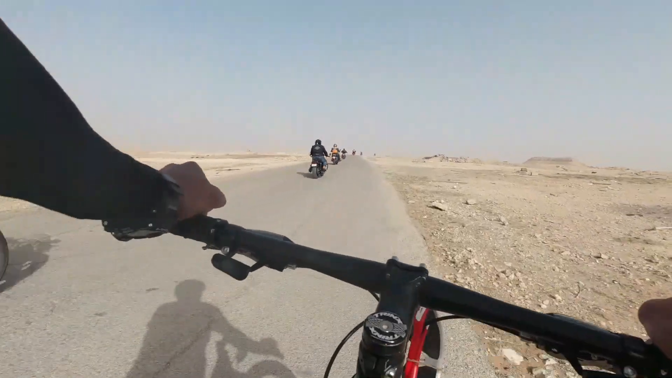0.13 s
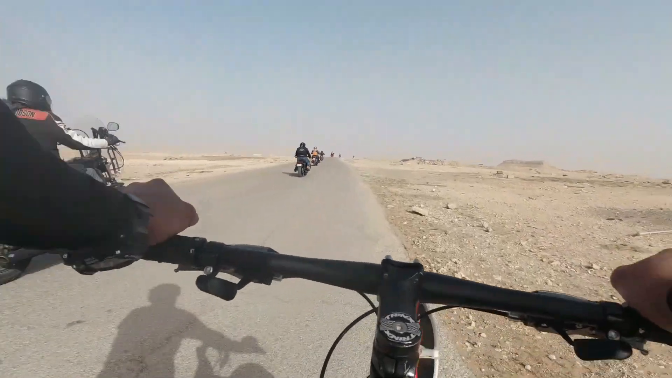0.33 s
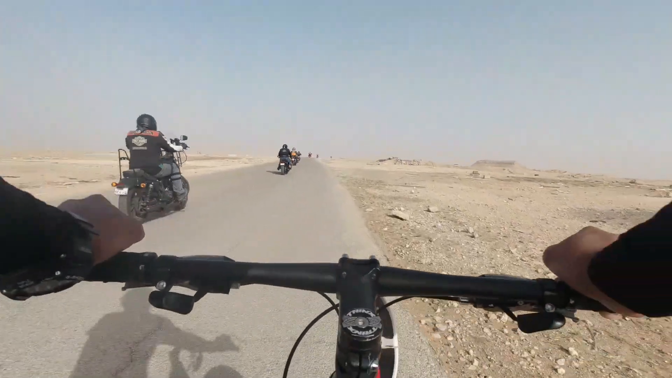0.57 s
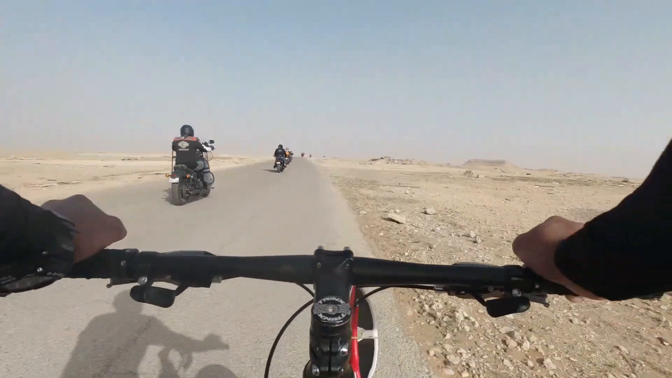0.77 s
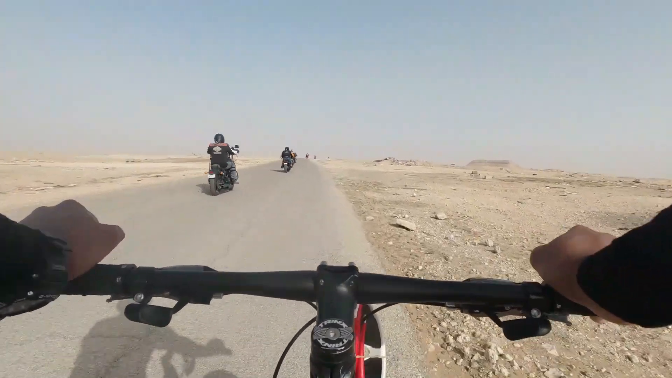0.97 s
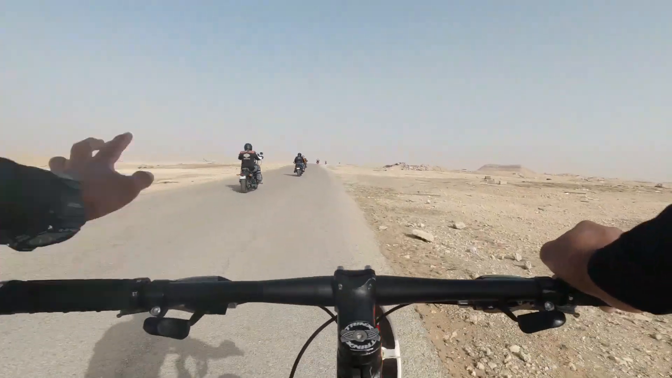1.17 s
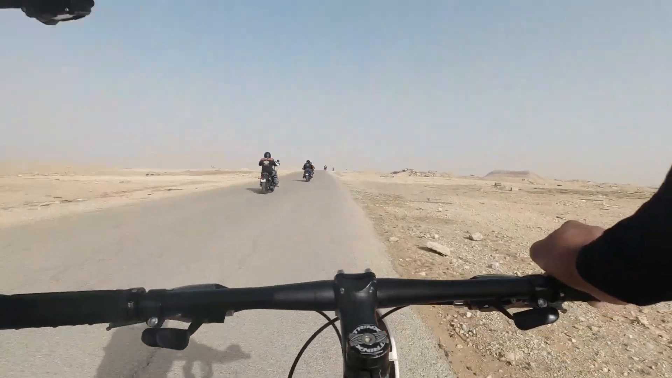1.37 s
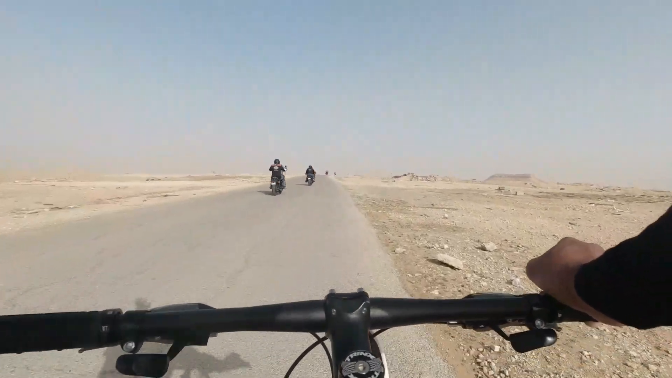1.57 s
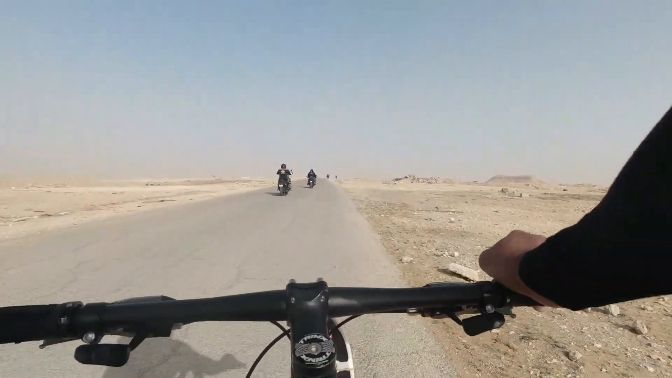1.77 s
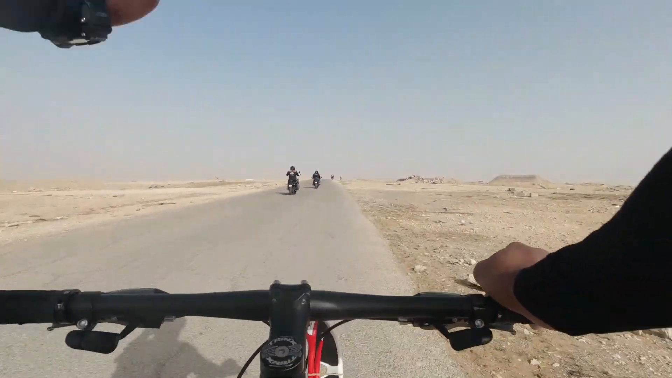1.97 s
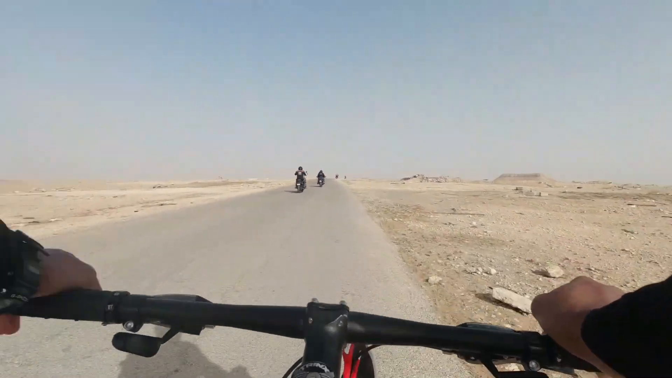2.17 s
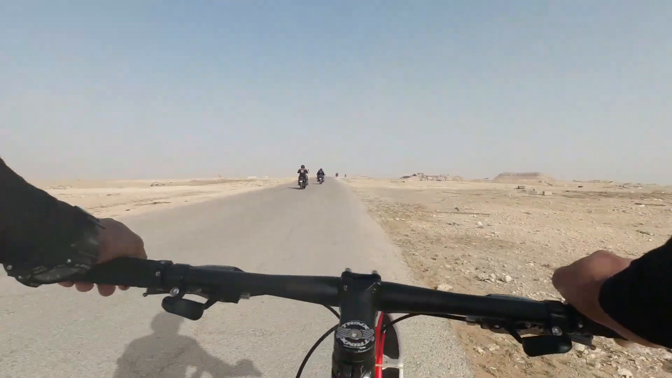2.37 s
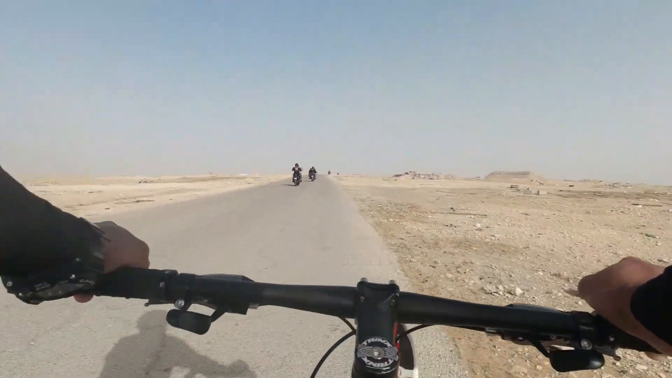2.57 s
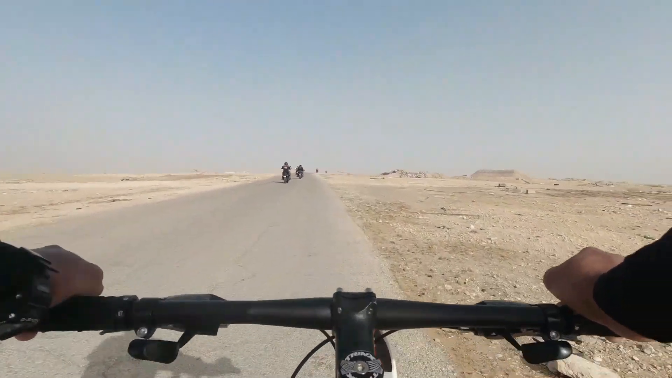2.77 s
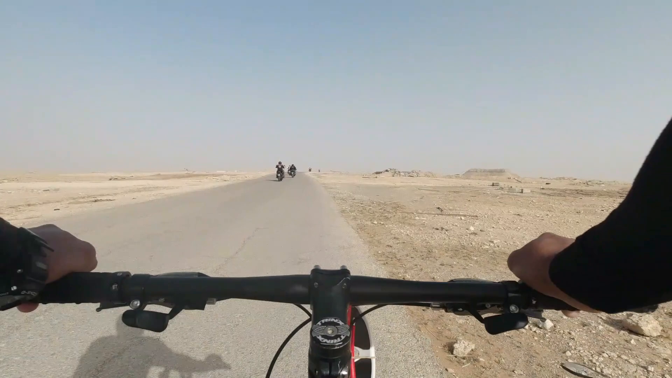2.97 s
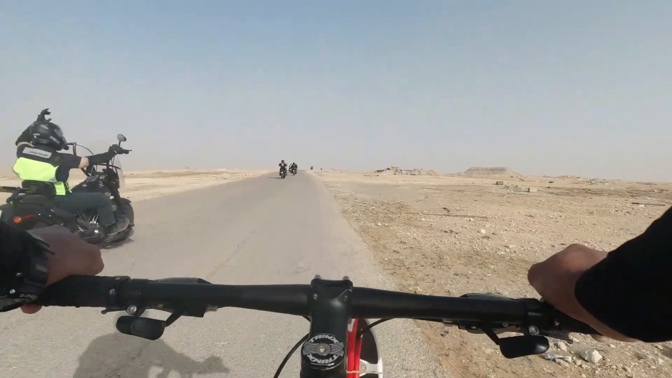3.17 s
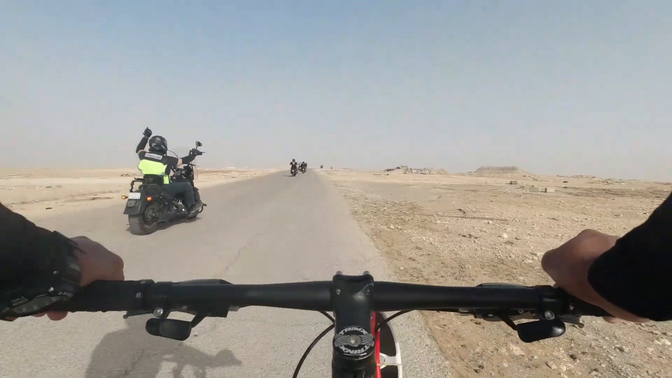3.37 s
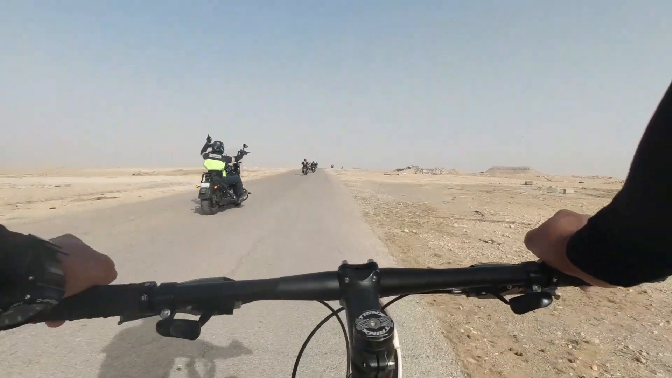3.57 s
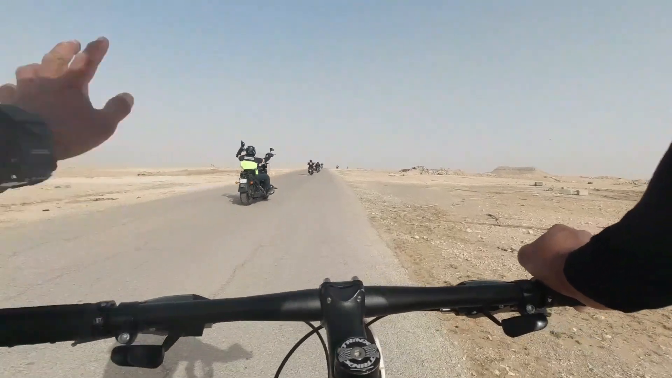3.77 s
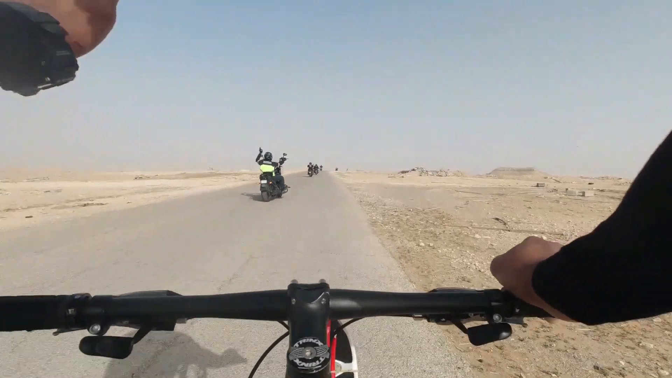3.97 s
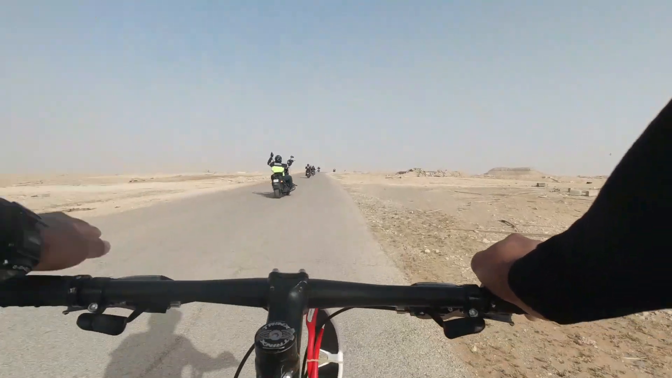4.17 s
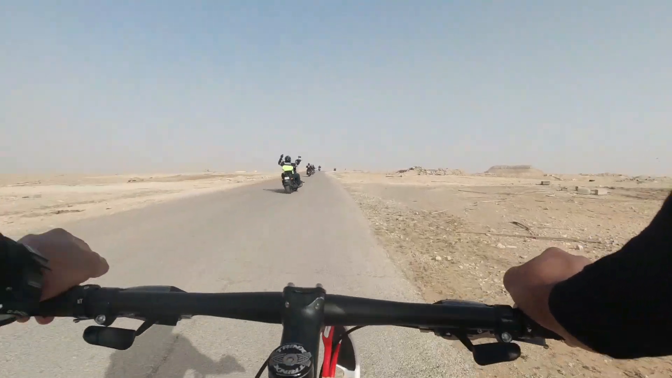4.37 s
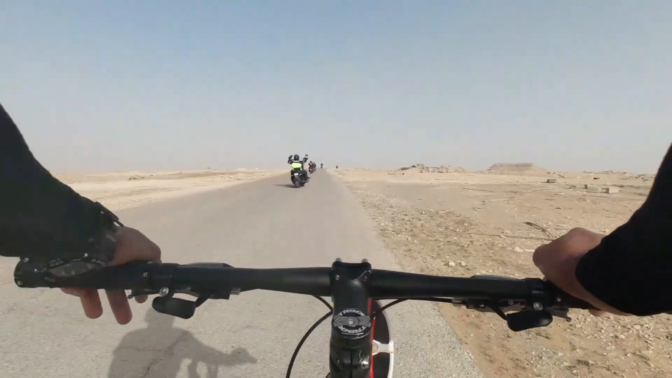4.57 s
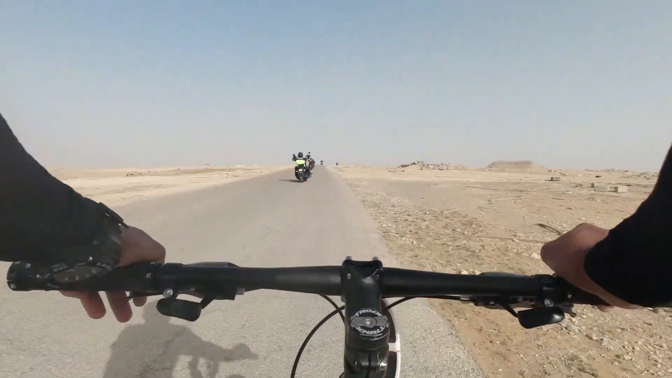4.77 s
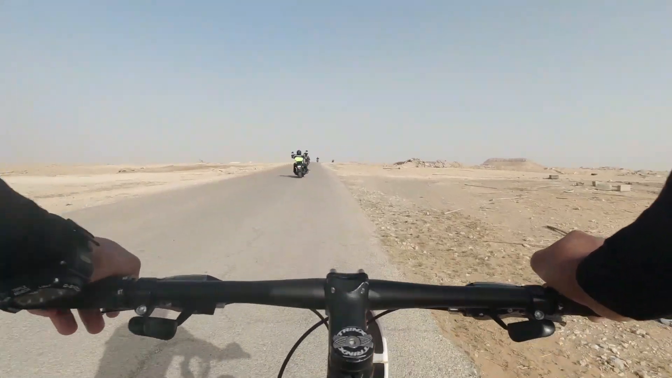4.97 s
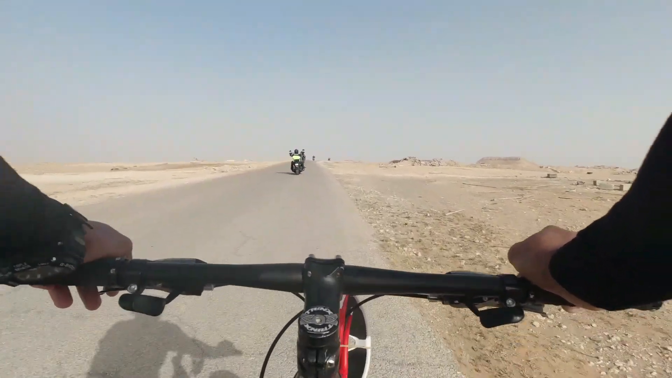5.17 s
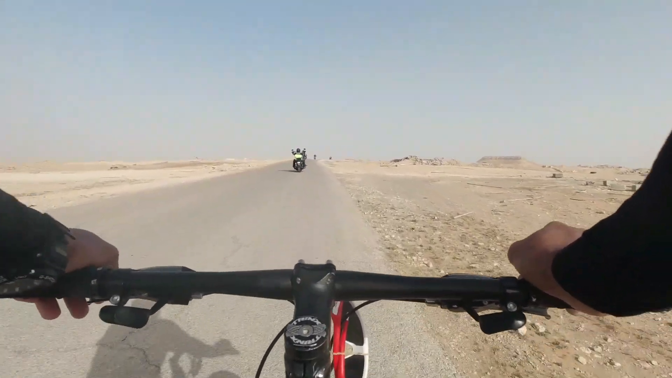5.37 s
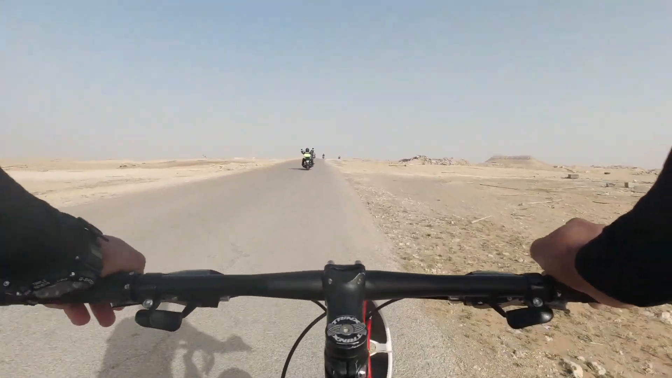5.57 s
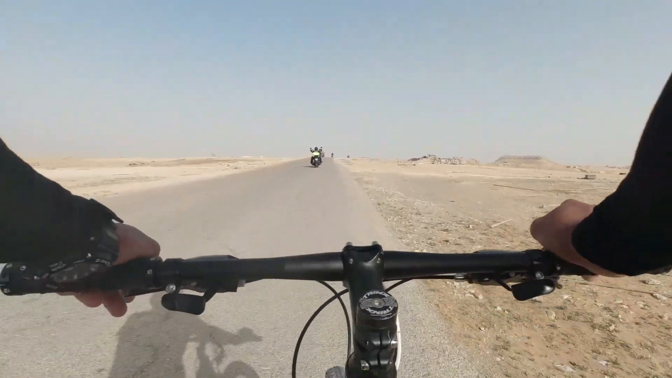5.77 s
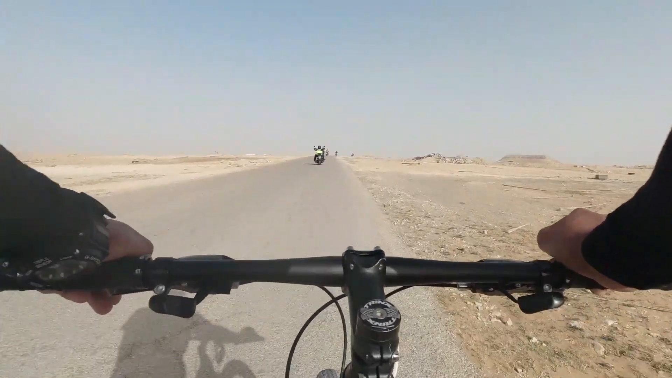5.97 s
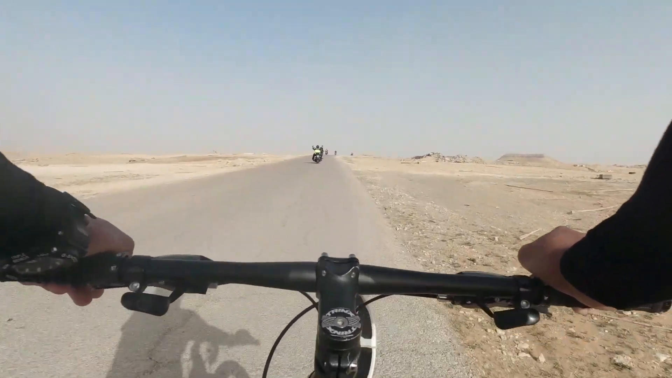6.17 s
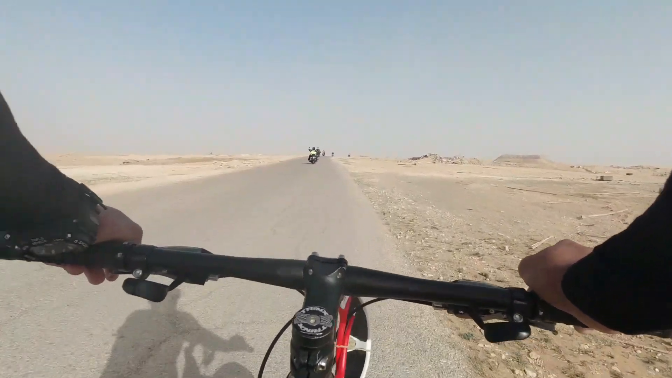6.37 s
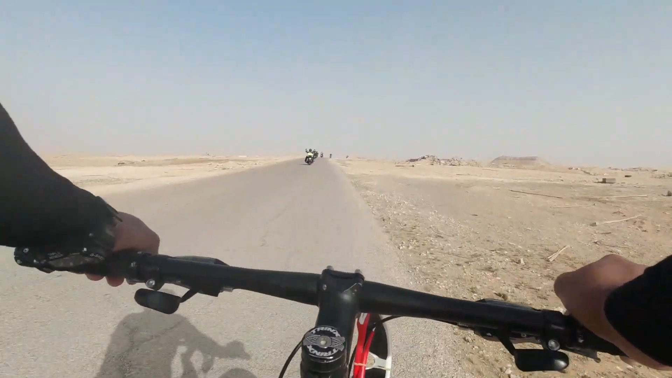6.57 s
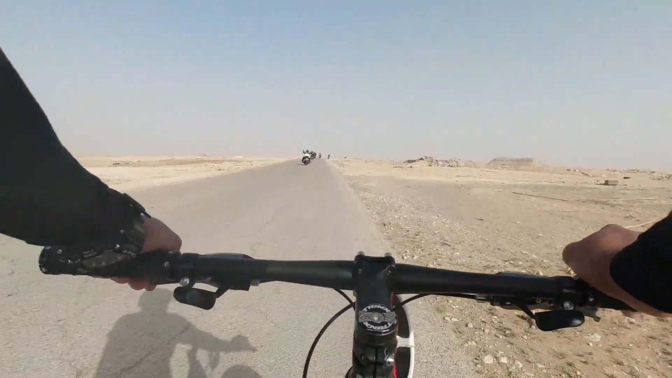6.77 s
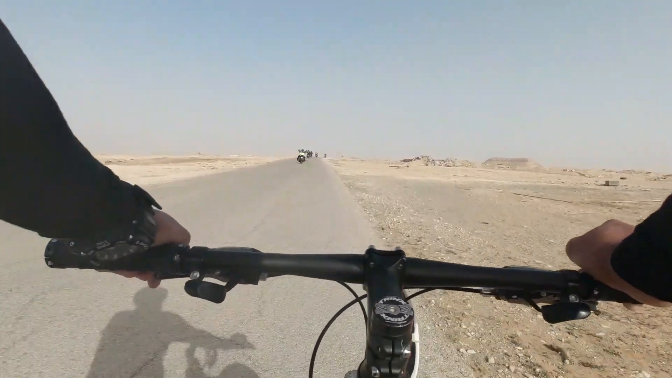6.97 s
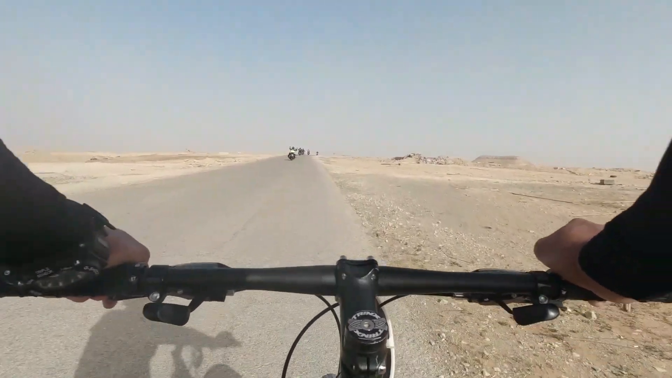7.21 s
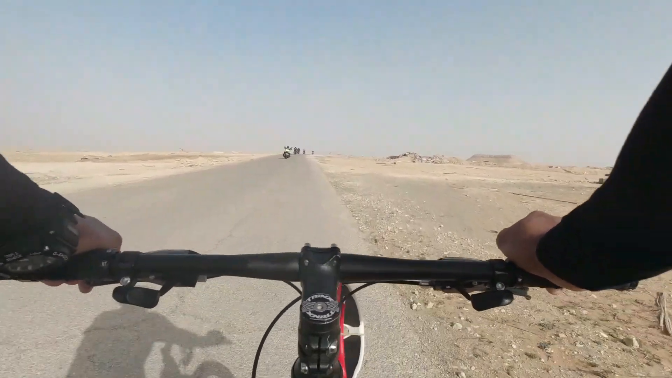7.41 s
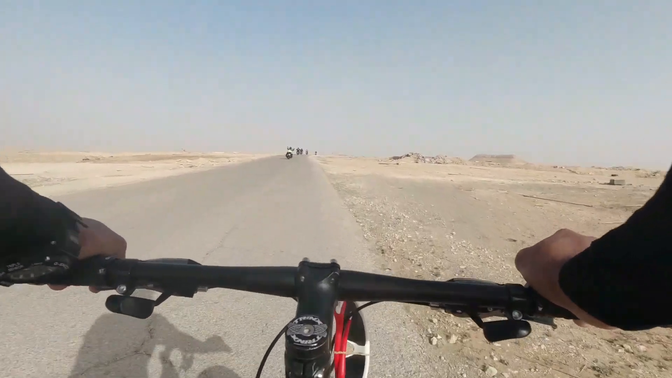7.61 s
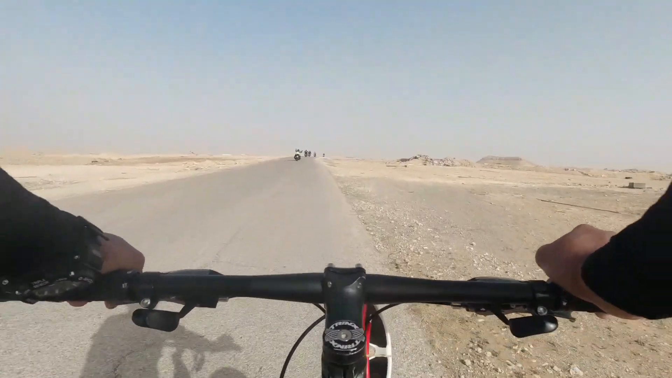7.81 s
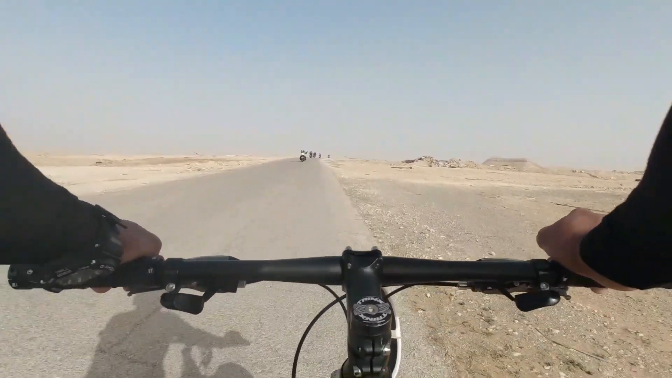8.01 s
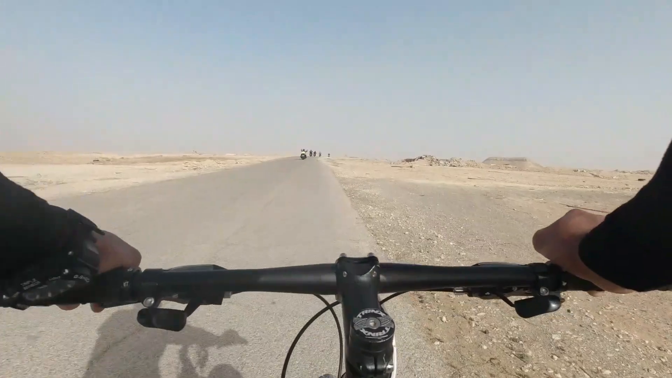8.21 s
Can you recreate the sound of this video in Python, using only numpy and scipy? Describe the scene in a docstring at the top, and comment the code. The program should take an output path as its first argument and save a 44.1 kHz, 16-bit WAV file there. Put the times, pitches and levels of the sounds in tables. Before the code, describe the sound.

Two motorcycles overtake a bicycle on an open road: first a raw, rasping blast, then a softer deep throb, both fading into low wind.

```python
"""Two motorcycles overtake a bicycle

On an open road one V-twin passes close by, shifts up and crackles away; a muffled twin follows it past.
Far up the road a twin opens its throttle. Firings ring each exhaust pipe and spit bursts of gas;
tyres roar alongside. The microphone has two ports and rides on the cyclist's chest, which reflects the
sound; wind buffets the ports, an arm swishes and clothing brushes."""
import sys
import numpy as np
from scipy import signal
from scipy.fft import rfft, irfft
from scipy.io import wavfile
from scipy.ndimage import uniform_filter1d, minimum_filter1d, map_coordinates

SR = 44100
rng = np.random.default_rng(int(sys.argv[2]) if len(sys.argv) > 2 else 0)


def wrap_up_sound(samples):
    """Save the sound to the file named by the first command line argument, as 16-bit audio."""
    columns = np.atleast_2d(samples).T
    # keep every value between -1 and 1, then stretch to whole-number steps
    tamed = np.clip(columns, -1, 1)
    steps = np.round(tamed * 32767).astype(np.int16)
    wavfile.write(sys.argv[1], SR, steps)


N = 363825
T = np.arange(N) / SR  # time in seconds
F = np.arange(N // 2 + 1) * SR / N + 1e-6  # frequency in Hz, kept off zero

# Colour of the tyre noise of both passing bikes. Each row: frequency in Hz, density in dB per Hz.
TYRE_SPECTRUM = [(40, 4), (200, 11.5), (500, -3), (850, -4), (1300, -5.5), (1800, -0.5), (2400, -15),
                 (3200, -9), (4200, -16.5), (6000, -22.5), (8400, -28.5), (14000, -28.5), (16000, -39)]


def undb(db):
    """Turn dB into an amplitude factor."""
    return 10 ** (np.asarray(db) / 20)


def unit(x):
    """Scale a sound to rms 1."""
    return x / np.sqrt(np.mean(x ** 2))


def curves(table):
    """The columns of a table, joined by straight lines in time."""
    s, *columns = np.transpose(table)
    return [np.interp(T, s, column) for column in columns]


def colour(x, spectrum):
    """Give white sound a spectrum, drawn straight over log frequency."""
    hz, db = np.transpose(spectrum)
    return irfft(rfft(x) * undb(np.interp(np.log(F), np.log(hz), db)), N)


def noise(spectrum, channels=3):
    """Unrelated noises of one colour, rms 1."""
    return unit(colour(rng.standard_normal((channels, N)), spectrum))


def treble_unit(x):
    """Scale a sound so that its part above 2 kHz has rms 1."""
    high_pass = signal.butter(4, 2000, "high", fs=SR, output="sos")
    return x / np.std(signal.sosfilt(high_pass, x))


def walk(rate):
    """Random levels held 1 / rate s and slewed twice; spread near 1."""
    hold = int(SR / rate)
    steps = np.repeat(rng.standard_normal(N // hold + 1), hold)
    return 1.3 * uniform_filter1d(uniform_filter1d(steps, hold), hold)[:N]


def swell(at_s, length_s):
    """A smooth rise and fall, 1 at its top."""
    return np.exp(-((T - at_s) / length_s) ** 2)


def delayed(x, seconds):
    """Read a sound through a moving delay."""
    return map_coordinates(x, [(T - seconds) * SR], order=3)


def wander_phase(hz, stray, rate):
    """Phase in radians of a tone whose pitch strays by a share of itself."""
    return 2 * np.pi * np.cumsum(hz * (1 + stray * walk(rate))) / SR


def overtake(abreast_s, speed, gap, shadow_edge, softness=0.053):
    """Cosine of the bearing, nearness (1 alongside) and body shadow (0-1) of a bike passing at a side gap.

    Speed is in m/s and gap in metres; the cyclist's body shades a bike that is still behind.
    """
    along = speed * (T - abreast_s)
    distance = np.hypot(along, gap)
    ahead = along / distance
    shadow = (1 - np.tanh((ahead + shadow_edge) / softness / 2)) / 2
    return ahead, gap / distance, shadow


def firings(speed, crank, scatter_db):
    """One pulse train for each cylinder; no two firings are equally strong."""
    start, rear_lag = crank  # in four-stroke cycles
    cycles = start + np.cumsum(curves(speed)[0]) / SR
    pulses = np.zeros((2, N))
    for train, lag in zip(pulses, (0, rear_lag)):
        at = np.flatnonzero(np.diff(np.floor(cycles - lag)))
        train[at] = undb(scatter_db * rng.standard_normal(len(at)))
    return pulses


def ring_pipe(pulses, pipe, soft_hz, low_hz=60):
    """The firings of both cylinders ring each mode of the pipe; one row per mode."""
    s, push = 1j * F, rfft(pulses)
    # the valve opens gradually, and a small outlet radiates no deep bass
    push = push * soft_hz ** 2 / (s * s + np.sqrt(2) * soft_hz * s + soft_hz ** 2)
    push = push * s * s / (s * s + np.sqrt(2) * low_hz * s + low_hz ** 2)
    modes = []
    for k, (hz, width, front_db, rear_db, *_) in enumerate(pipe):
        resonance = -(-1) ** k * s * width / (s * s + s * width + hz ** 2)
        drive = undb(front_db) * push[0] + undb(rear_db) * push[1]
        modes.append(irfft(resonance * drive, N))
    return np.array(modes)


def exhaust(pulses, pipe, ahead, shadow, shade_db, soft_hz):
    """A passing pipe: dulled by the body's shadow, each mode changing as the outlet turns to the listener."""
    facing = np.maximum(ahead, 0) ** 2
    sound = 0
    for row, mode in zip(pipe, ring_pipe(pulses, pipe, soft_hz)):
        octaves = np.log2(row[0] / 50)  # shade_db is per octave above 50 Hz
        sound = sound + mode * undb(row[4] * facing + shade_db * shadow * octaves)
    return unit(sound)


def gas(pulses, spectrum, rear_db, decay_s, tail_db, shock_db=1, tail_s=0.033, wait_s=0.00081,
        rise_s=0.0024, channels=3):
    """A crack of gas leaves the pipe just after each firing and trails off."""
    age = np.maximum(T[:SR // 10] - wait_s, 0)
    fall = np.exp(-age / decay_s) + undb(tail_db) * np.exp(-age / tail_s)
    burst = (1 - np.exp(-age / rise_s)) * fall
    # jet noise grows with the square of the firing strength
    strength = pulses[0] ** 2 + undb(rear_db) * pulses[1] ** 2
    turbulence = signal.oaconvolve(strength, burst)[:N] * rng.standard_normal((channels, N))
    # the shock front rattles down the pipe the same way every time
    rattle = burst * rng.standard_normal((channels, len(burst)))
    shock = signal.oaconvolve(strength[None], rattle)[:, :N]
    return treble_unit(colour(turbulence + undb(shock_db) * shock, spectrum))


def ragged(x, share=1.0, echo_s=0.000774, sway_s=0.0002276, rate=18):
    """A short echo of wandering length gives every burst its own colour."""
    at = (T - echo_s - sway_s * walk(rate)) * SR
    echo = np.array([np.interp(at, np.arange(N), channel) for channel in x])
    return (x + share * echo) / np.hypot(1, share)


def at_camera(pipes, hiss, ahead, scatter_hz):
    """Chest echo comes later as a source moves ahead; the lag between the ports is greatest abreast."""
    # arms and handlebar scatter short waves, so that each port gets its own treble
    scattered = 1 / (1 + (scatter_hz / F) ** 4)
    hiss = rfft(hiss)
    direct = pipes + irfft(hiss[0] * np.sqrt(1 - scattered), N)
    chest_share = 0.53  # echo amplitude relative to the direct sound
    chest_echo = delayed(direct, 0.00033 * (0.68 + 0.27 * ahead))
    sound = (direct + chest_share * chest_echo) / (1 + chest_share)
    port_lag_s = 0.00016 * np.sqrt(1 - ahead ** 2)
    treble = irfft(hiss[1:] * np.sqrt(scattered), N)
    return np.array([delayed(sound, port_lag_s), sound]) + treble


def wind(steady_db=-36.5, shared=.6, gust_db=1.0, buffet_db=1.8):
    """Air buffets each port on its own, part of its rush is common, and it swells in each bike's wake."""
    # Rush of air over the ports. Each row: frequency in Hz, density in dB per Hz.
    wind_spectrum = [(20, -3), (45, -4), (90, 5.5), (200, 3.5), (350, -7), (600, -17.5), (1000, -30.5),
                     (1500, -40.5), (2200, -32.5), (3100, -46), (4500, -62), (7000, -56.5), (11000, -64),
                     (16000, -69)]
    # Air pushed aside by each passing bike. Each row: time in seconds, half length in seconds, rise in dB.
    wakes = [(0.594, 1, 9.5), (3.83, 0.89, 4.5)]
    first, second, both = noise(wind_spectrum)
    ports = np.array([port * undb(buffet_db * walk(22)) for port in (first, second)])
    rush = np.sqrt(1 - shared) * ports + np.sqrt(shared) * both  # shared is a share of the power
    wake_db = sum(db * swell(s, length) for s, length, db in wakes)
    return undb(steady_db + wake_db + gust_db * walk(4.15)) * rush


def swish(at_s=2.05, length_s=0.19, level_db=-52):
    """A soft swell of coloured noise, the air moved while the cyclist waves an arm."""
    air = noise([(200, -21), (700, 1), (1200, 6), (1700, -3.5), (3000, -11), (6000, -40), (16000, -45)],
                channels=1)
    return undb(level_db) * swell(at_s, length_s) * air


def pedalling(length_s=0.14):
    """Clothing brushes faintly with the turn of the pedals: swells of airy noise."""
    # Faint brushes, one per turn. Each row: time in seconds, level in dB.
    brushes = [(5.82, -79), (6.9, -74), (7.98, -73.5)]
    cloth = noise([(2000, -20), (5300, 6), (7000, -3), (9500, 10), (16000, -11)], channels=2)
    return sum(undb(db) * swell(s, length_s) for s, db in brushes) * cloth


def far_twin(exhaust_db=-33.5, gas_db=-58.0, gas_load=0.3):
    """A twin far up the road opens its throttle; moving air makes its level waver."""
    # Engine speed. Each row: time in seconds, four-stroke cycles per second.
    engine_speed = [(0, 13.2), (2.5, 13.2), (5, 12.5), (5.7, 12.82), (6.2, 13.46), (6.8, 14.03),
                    (7.4, 15.06), (8.25, 16.2)]
    # Throttle. Each row: time in seconds, level in dB relative to pulling.
    throttle = [(0, 1), (2, -6), (4.3, -10.5), (5.6, -15), (5.85, -7.5), (6.1, 0), (6.45, -2.5),
                (6.75, -1.5), (7, -5), (7.25, -3), (7.6, -9.5), (8.25, -4)]
    # Pipe modes. Each row: frequency in Hz, width in Hz, front cylinder in dB, rear cylinder in dB.
    pipe_modes = [(101.6, 81.5, -3.5, -6.5), (115, 60.5, 0.0, -7.5), (125, 40, -11, -27),
                  (233.9, 124, -8.5, -19.5), (234.6, 67, -7.5, -17.5), (370, 67, -28.0, -15.0),
                  (365.4, 82, -15.5, -25.5), (605, 26.6, -23.5, -35), (913, 80.9, -32, -30)]
    # Colour of the gas bursts. Each row: frequency in Hz, density in dB per Hz.
    gas_spectrum = [(200, -7), (600, 17.5), (1000, 10.5), (1600, 3), (2300, -2.5), (3200, -2),
                    (4000, -17.5), (4700, -22), (5500, -30.5), (7000, -46), (11000, -42), (16000, -70)]
    throttle_db, = curves(throttle)
    pulses = firings(engine_speed, crank=(.946, .442), scatter_db=1.2)
    uneven = pulses * undb(.8 * walk(30))
    cracks = gas(uneven, gas_spectrum, rear_db=0, decay_s=0.0021, tail_db=-16, wait_s=0.00508)
    pipes = unit(ring_pipe(pulses, pipe_modes, soft_hz=654).sum(axis=0))
    pipes = undb(exhaust_db + throttle_db) * pipes
    # gas_load: dB of gas per dB of throttle
    hiss = undb(gas_db + gas_load * throttle_db) * ragged(cracks, share=0.6)
    waver = undb(.7 * walk(5))
    return waver * at_camera(pipes, hiss, ahead=1.0, scatter_hz=4460)


def roar(start_s=2.77, rise_s=0.023, fade_s=0.54, level_db=-37, flutter_db=2.5):
    """The second bike's belt and tyres break into a rough roar as it leaves the body's shadow."""
    age = np.maximum(T - start_s, 0)
    grain = noise([(400, -21), (800, 1.5), (1300, -3), (1800, -1), (2300, -29), (3200, -24),
                   (6000, -21), (16000, -40)])
    envelope = (1 - np.exp(-age / rise_s)) * np.exp(-(age / fade_s) ** 2)
    return undb(level_db + flutter_db * walk(120)) * envelope * grain


def second_bike(exhaust_db=-11.0, puff_db=-50, rush_db=-19, outlet_angle=0.61, beam_width=0.77):
    """A muffled twin eases off as it passes: deep throb, soft puffs of gas and tyre roar."""
    # Engine speed. Each row: time in seconds, four-stroke cycles per second.
    engine_speed = [(0, 16.6), (1.5, 16.5), (2.1, 16.0), (2.6, 15.57), (3, 14.84), (3.3, 14.2), (3.7, 13.6),
                    (4.5, 13.3), (8.25, 13.0)]
    # Throttle. Each row: time in seconds, level in dB relative to pulling.
    throttle = [(0.0, 2), (1.9, -20), (2.2, -5.5), (2.7, -6.5), (2.9, -2.5), (3.15, 1.28), (3.45, -0.33),
                (3.65, -12), (3.9, -9), (4.15, -27), (8.25, -26)]
    # Pipe modes. Each row: frequency in Hz, width in Hz, front cylinder in dB, rear cylinder in dB,
    # gain in dB when the outlet faces the listener.
    pipe_modes = [(70, 25.7, -13, -19.5, 3), (112.4, 49.7, -14.5, -16.5, -1.5),
                  (166.4, 58.8, -31.5, -11.5, 1), (168.7, 27.5, -18, -22.5, 12.5),
                  (190, 19.4, -7.5, 0.0, 2.5), (189.5, 42, -14, -1.63, 2.4), (300.4, 19.7, -20, -18.5, 2.8),
                  (324.6, 23.1, -20.5, -29.5, 8), (356, 74, -28.5, -33, 5), (441.3, 8.3, -38.5, -35.5, 18),
                  (594.7, 7.7, -41.0, -42, 21.5)]
    # Colour of the gas puffs. Each row: frequency in Hz, density in dB per Hz.
    puff_spectrum = [(200, -44), (900, 17), (1200, 16), (1600, -10), (2300, 6), (3200, 2.5), (4000, -1),
                     (4700, -7.5), (5500, -15.5), (7000, -24), (11000, -14.5), (16000, -46)]
    # Colour of the muffled gas flow. Each row: frequency in Hz, density in dB per Hz.
    flow_spectrum = [(150, -7), (350, 6), (580, 9), (850, -14), (1170, -9), (1500, -42), (3200, -25),
                     (6000, -31), (16000, -37)]
    ahead, near, shadow = overtake(abreast_s=3.05, speed=8.0, gap=2.3, shadow_edge=0.77)
    throttle_db, = curves(throttle)
    loudness = near * undb(exhaust_db + throttle_db)
    pulses = firings(engine_speed, crank=(-.01, .425), scatter_db=.5)
    puffs = undb(puff_db) * gas(pulses, puff_spectrum, rear_db=1, decay_s=0.0012, tail_db=-15)
    puffs = puffs * near * undb(-2 * shadow + 3.5 * ahead)
    tyres = undb(-29.5 - 4.3 * shadow) * near ** 2.84 * noise(TYRE_SPECTRUM)
    # the muffler evens the gas into a steady rush, heard while its outlet faces the listener (radians)
    beam = np.exp(-((np.arccos(ahead) - outlet_angle) / beam_width) ** 2)
    rush = loudness * undb(rush_db) * beam * noise(flow_spectrum)
    pipes = loudness * exhaust(pulses, pipe_modes, ahead, shadow, shade_db=-1.6, soft_hz=664)
    # a throaty rasp as the outlet swings past
    throat = noise([(700, -17), (1000, -9), (1200, 6), (1500, -31), (3000, -60)])
    throat = undb(-35) * swell(3.35, 0.073) * throat
    return at_camera(pipes, puffs + tyres + roar() + rush + throat, ahead, scatter_hz=4000)


def rasp(pulses, width_hz, decay_s=0.008, rough=.12, wait_s=.001, stray=.06, spread=.06):
    """Firings and the gas behind them ring bands of straying pitch; each swells and fades at its own time."""
    # Swells of ringing rasp. Each row: time in seconds, half length in seconds, centre in Hz, level in dB.
    rasp_bands = [(0.125, 0.14, 683, -29.5), (0.44, 0.091, 1560, -22.5), (0.456, 0.13, 1003, -27),
                  (.74, 0.17, 2900, -38), (1.057, 0.23, 5180, -42.5), (0.94, 0.24, 614.6, -28.5),
                  (1.11, 0.23, 1061, -36.5), (1.317, 0.22, 822, -35.5), (1.39, 0.11, 2620, -46.5),
                  (2.96, 0.22, 3300, -52), (3.74, 0.11, 3750, -54), (.5, 0.36, 409.3, -26),
                  (1.0, 0.38, 9760, -54)]
    age, blows = T[:SR // 30], pulses.sum(axis=0)
    gas_behind = signal.oaconvolve(blows, np.exp(-age / decay_s))[:N] * rng.standard_normal(N)
    push = blows + rough * gas_behind
    age = np.maximum(age - wait_s, 0)
    out = 0
    for s, length, hz, db in rasp_bands:
        ring = age * np.exp(-np.pi * (width_hz + spread * hz) * age)  # higher bands ring shorter
        rings = signal.oaconvolve(push, ring)[:N]
        tone = np.sin(wander_phase(hz, stray, rate=36))
        out = out + undb(db) * swell(s, length) * unit(rings * tone)
    return out


def ticks(pulses, pitch_hz=3120, stray=0.08, ring_s=0.0006, wait_s=.0027):
    """A short ringing tick after each firing, as it reaches the microphone by three paths."""
    age = np.maximum(T[:SR // 50] - wait_s, 0)
    rings = signal.oaconvolve(pulses.sum(axis=0), age * np.exp(-age / ring_s))[:N]
    phase = wander_phase(pitch_hz, stray, rate=44)
    # the phase wanders separately on each path
    return unit(rings * np.array([np.sin(phase + walk(10)) for _ in range(3)]))


def crackle(pulses, tick_db=-4, crack_db=-2, air_hz=4800, uneven_db=0.7):
    """Dry pops carry back from up the road; the air takes off their top as the distance grows."""
    # Level as the first bike draws away. Each row: time in seconds, level in dB.
    crackle_level = [(.4, -66), (.7, -48), (1.1, -51), (1.6, -61), (2.3, -62), (2.65, -57), (2.95, -48),
                     (3.3, -52), (3.7, -52), (4.5, -58), (5.5, -60), (6.3, -63), (6.9, -58), (8.25, -64)]
    # Colour of the pops. Each row: frequency in Hz, density in dB per Hz.
    pop_spectrum = [(200, -15), (900, -40), (1600, 14), (3100, 7), (4700, -10), (5500, -3.5), (7000, -28.5),
                    (9500, -20), (11000, -10), (12500, -29), (16000, -35)]
    level_db, = curves(crackle_level)
    cracks = ragged(gas(pulses, pop_spectrum, rear_db=-1, decay_s=.0009, tail_db=-32,
                        wait_s=.0027, rise_s=.0008))
    dull = irfft(rfft(cracks) / np.hypot(1, (F / air_hz) ** 6), N)
    top = np.interp(T, [4.2, 6.5], [1, 0])
    pops = undb(crack_db) * (top * cracks + (1 - top) * dull)
    return undb(level_db + uneven_db * walk(33)) * (undb(tick_db) * ticks(pulses) + pops)


def first_bike(exhaust_db=-4, gas_db=-25, gas_aim_db=1, gas_shadow_db=-4, gas_load=0.99, flicker_db=0.5):
    """Loud open pipes that point backwards: ringing modes, rasp, gas cracks and tyres, then distant crackle."""
    # Engine speed. Each row: time in seconds, four-stroke cycles per second.
    engine_speed = [(0, 18.31), (.5, 17.89), (1.1, 18.02), (1.6, 17.7), (1.95, 16.95), (2.3, 16.579),
                    (2.9, 16.314), (3.5, 16.522), (4.4, 16.952), (5.3, 17.663), (6, 18.234), (6.8, 18.607),
                    (7.5, 18.673), (8.25, 19.044)]
    # Throttle. Each row: time in seconds, level in dB relative to pulling.
    throttle = [(0, 0), (.2, 1.5), (.45, 3), (.8, -1.5), (1.15, 0), (1.21, -5), (1.35, -5.5), (1.55, -11.5),
                (1.75, -15), (2.5, -11), (6.2, -7.5), (8.25, -16.5)]
    # Misfire and hard firings. Each row: time in seconds, strength in dB relative to a usual firing,
    # extra crack of gas in dB.
    odd_firings = [(.087, 0.5, 4), (.197, 3, -3.5), (.642, 2, 1), (.665, -0.5, 2.5), (.721, 1, 1),
                   (.754, -0.5, 6.5), (.777, 1.5, 4), (.832, 0.5, 1.5), (.865, 2, 1.5), (.888, 0.5, 5),
                   (.921, -2.5, -3), (.999, 1, 3.5), (1.087, 0, 5), (1.198, -5, -4), (1.255, 2, 0.5),
                   (1.366, -1, 5.5), (1.422, 1, 1.5), (1.478, -1, 4), (1.535, 6.5, -8), (1.558, -2, -12),
                   (1.591, 0.5, -2)]
    # Pipe modes. Each row: frequency in Hz, width in Hz, front cylinder in dB, rear cylinder in dB,
    # gain in dB when the outlet faces the listener.
    pipe_modes = [(81.42, 29.7, 0.01, -9.5, 3), (85.44, 36.6, 0.0, -8, 3), (187, 67, -56.9, -22, -24),
                  (241.35, 12.7, -14, -9, -1.5), (242.6, 27.2, -13.5, -13, 6.5),
                  (282.8, 10, -53, -13.5, -8), (391.3, 130, -31, -27.5, 5.5),
                  (447.6, 82, -24.5, -21.5, 10.5), (462.5, 62, -25, -23, 11.5),
                  (599.5, 29, -33.5, -35.6, 12), (729, 96, -41.5, -46.5, 16), (994, 72, -36.5, -42.5, 7)]
    # Colour of the gas bursts close by. Each row: frequency in Hz, density in dB per Hz.
    gas_spectrum = [(40, -15), (200, 5.5), (600, 2), (1000, -8), (1500, -14), (2100, -11), (3100, -8),
                    (4200, -19), (5200, -18), (7000, -31), (8400, -28.5), (10300, -22.5), (11800, -29.5),
                    (14500, -25), (16000, -40)]
    ahead, near, shadow = overtake(abreast_s=0.41, speed=10.35, gap=2.18, shadow_edge=0.73)
    throttle_db, = curves(throttle)
    pulses = firings(engine_speed, crank=(.405, .413), scatter_db=.5)
    pulses = pulses * undb(sum(db * (abs(T - s) < .01) for s, db, _ in odd_firings))
    # the root, because gas squares the strength
    cracks = pulses * np.sqrt(undb(sum(db * (abs(T - s) < .01) for s, _, db in odd_firings)))
    pipes = exhaust(pulses, pipe_modes, ahead, shadow, shade_db=-3.6, soft_hz=678)
    pipes = pipes * near * undb(exhaust_db + throttle_db)
    close = gas(cracks, gas_spectrum, rear_db=-2.0, decay_s=0.0035, tail_db=-23.0, shock_db=5.0)
    # the long burst gives way to short pops with distance
    crisp = np.interp(T, [1.5, 2.3], [1, 0])
    # gas follows the throttle (gas_load: dB per dB) and dies faster with distance than the pipe note
    jet_db = gas_db + gas_load * throttle_db + gas_aim_db * ahead + gas_shadow_db * shadow
    jet = near ** 1.48 * undb(jet_db + flicker_db * walk(24.43))
    tyres = undb(-21.5) * near ** 1.9 * noise(TYRE_SPECTRUM)
    hiss = jet * ragged(crisp * close, share=0.77) + tyres + crackle(cracks)
    return at_camera(pipes + rasp(pulses, width_hz=76), hiss, ahead, scatter_hz=4400)


def scene():
    """The road as heard at the two ports: air and clothing, the far engine and the two passes."""
    return wind() + swish() + pedalling() + far_twin() + second_bike() + first_bike()


def record(dry):
    """The camera's limiter holds the loudest firings down; it rounds the peaks and cuts the top."""
    drive, ceiling, hold = 0.67, 1.0, SR // 40  # hold in samples
    room = ceiling / np.maximum(abs(dry).max(axis=0), ceiling)
    limited = dry * uniform_filter1d(minimum_filter1d(room, hold), hold)
    rounded = np.tanh(drive * limited) / drive
    return signal.sosfilt(signal.ellip(10, .1, 80, 15900, fs=SR, output="sos"), rounded)


dry = scene()
out = record(dry)
wrap_up_sound(out)
```